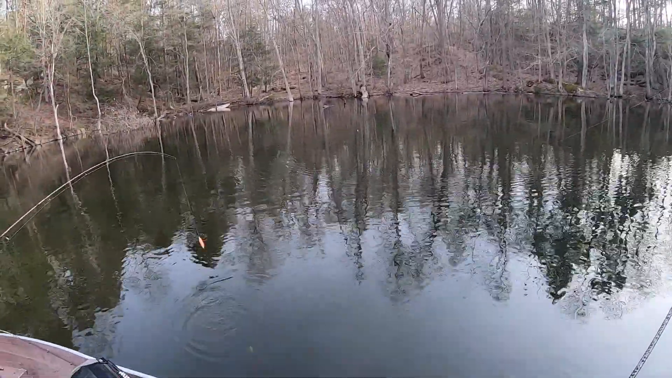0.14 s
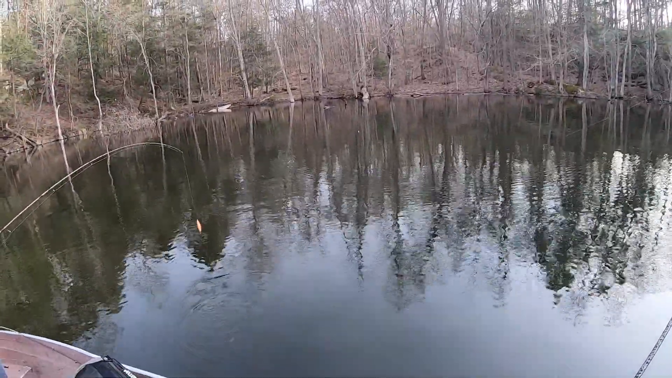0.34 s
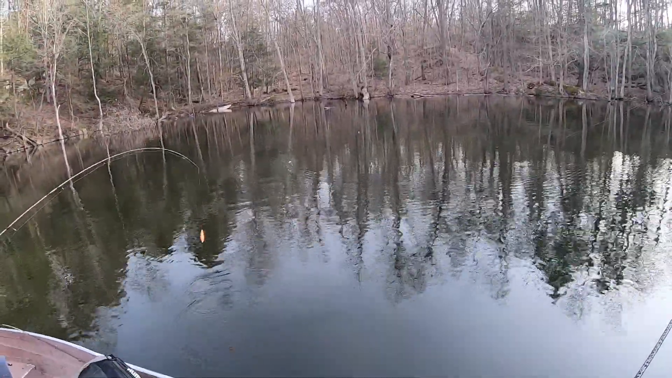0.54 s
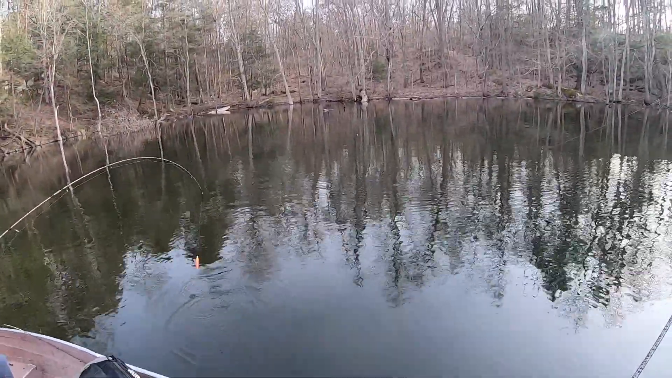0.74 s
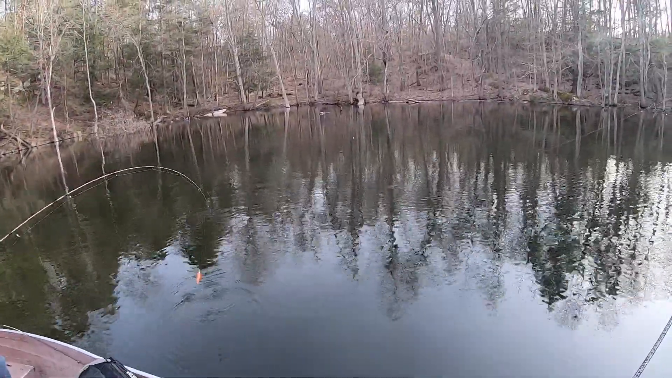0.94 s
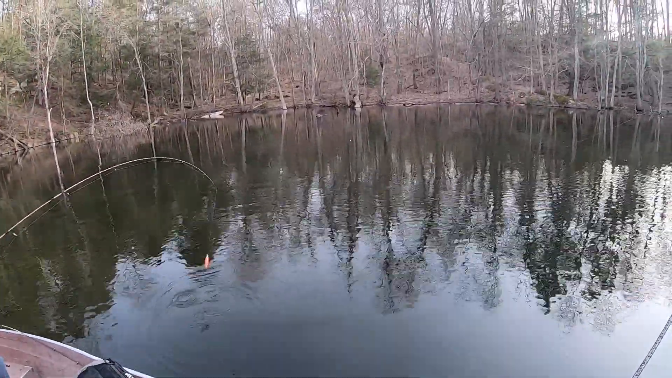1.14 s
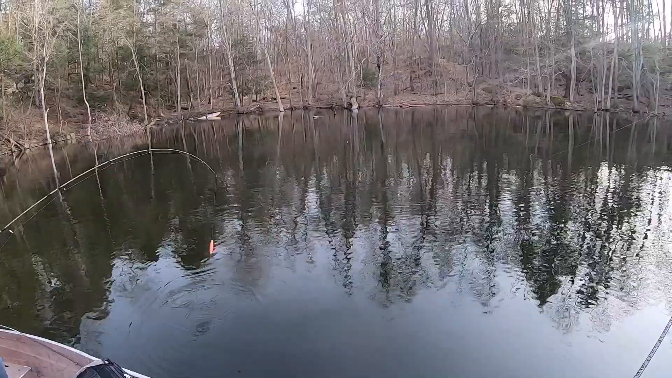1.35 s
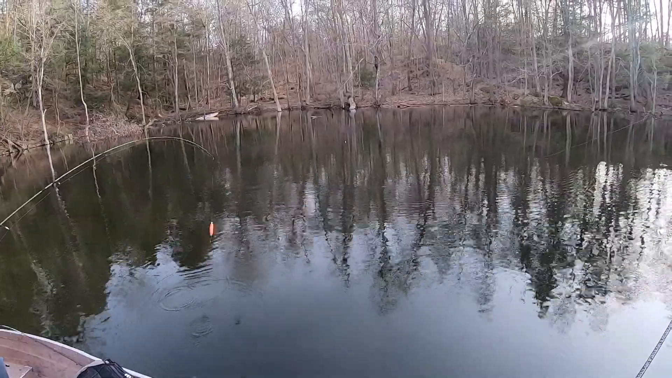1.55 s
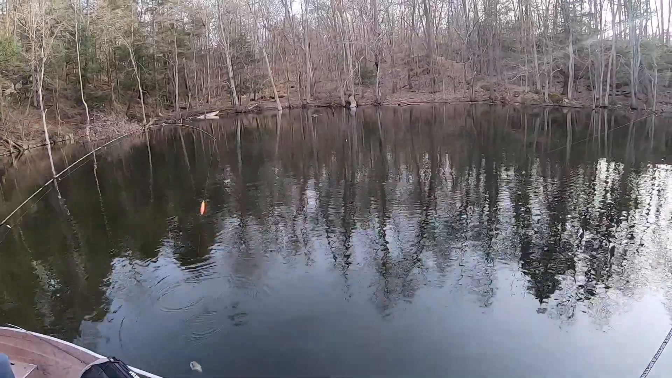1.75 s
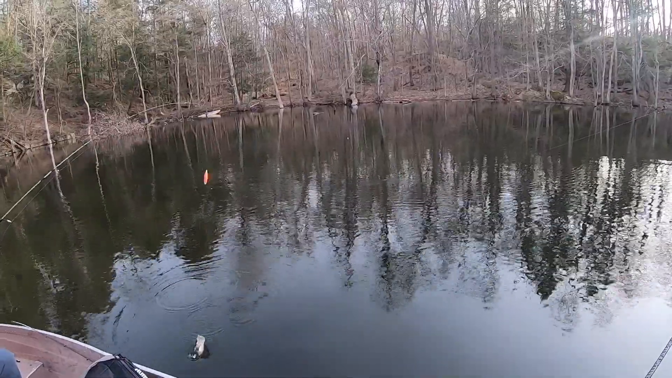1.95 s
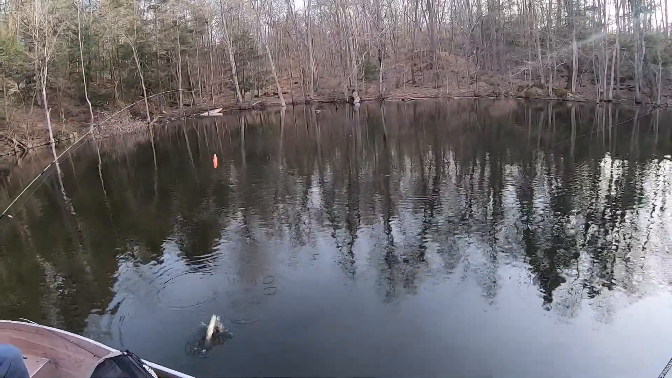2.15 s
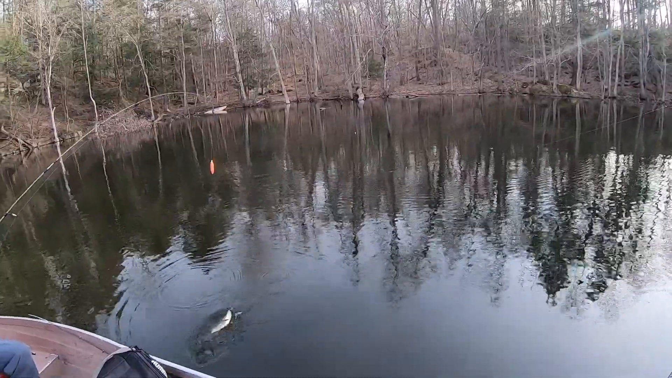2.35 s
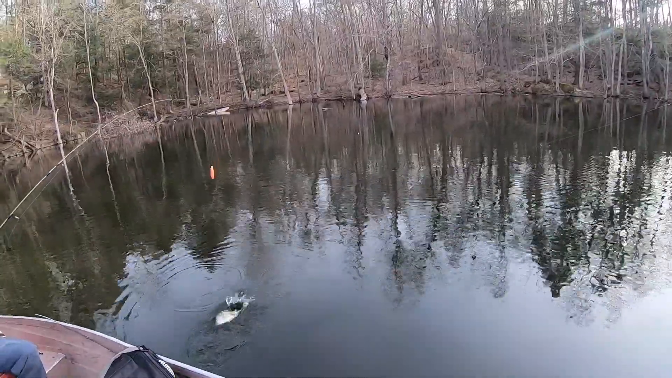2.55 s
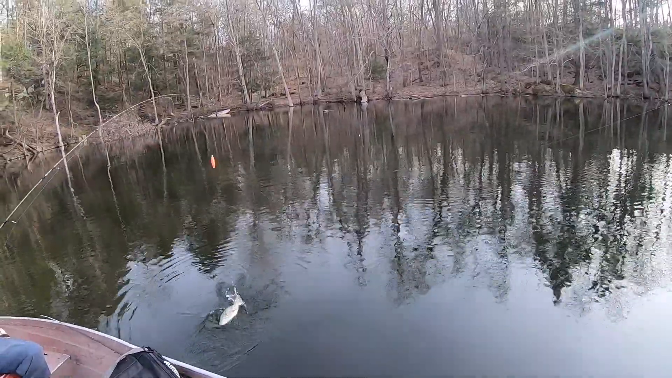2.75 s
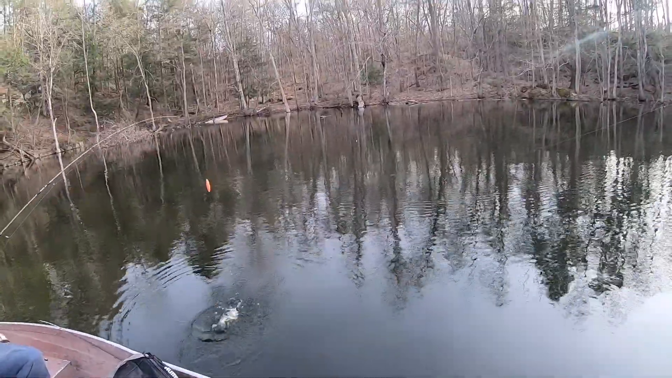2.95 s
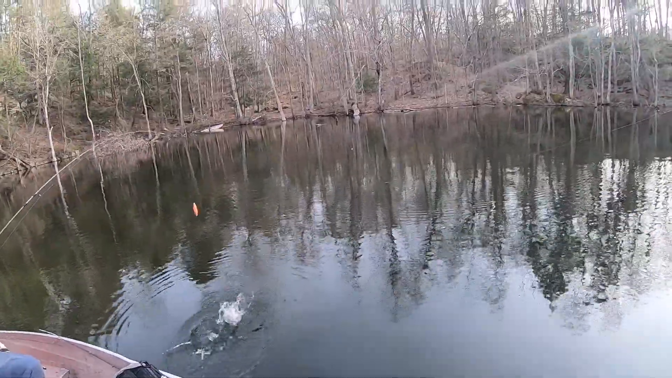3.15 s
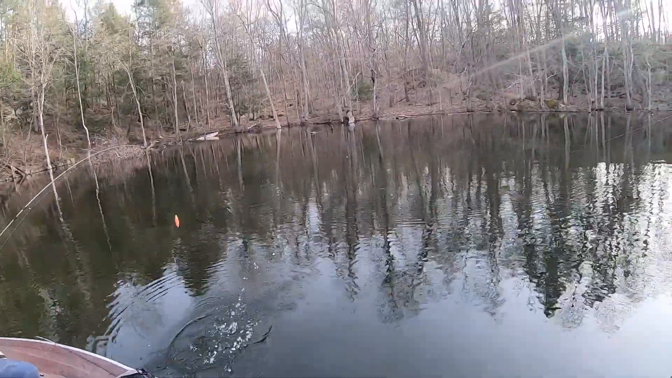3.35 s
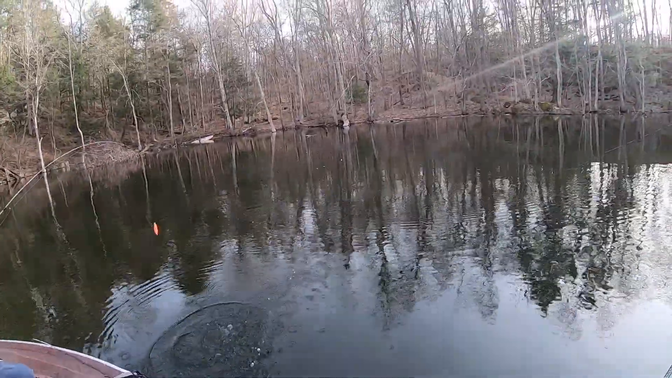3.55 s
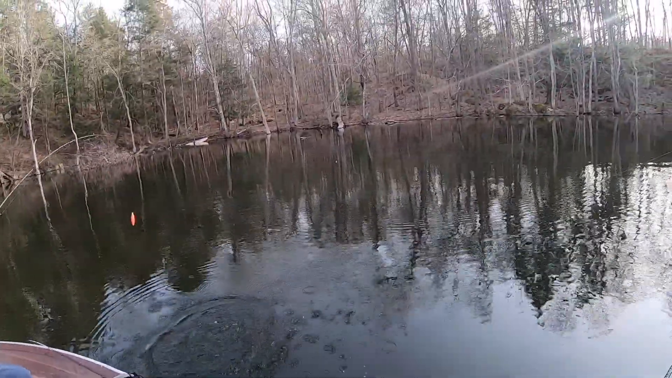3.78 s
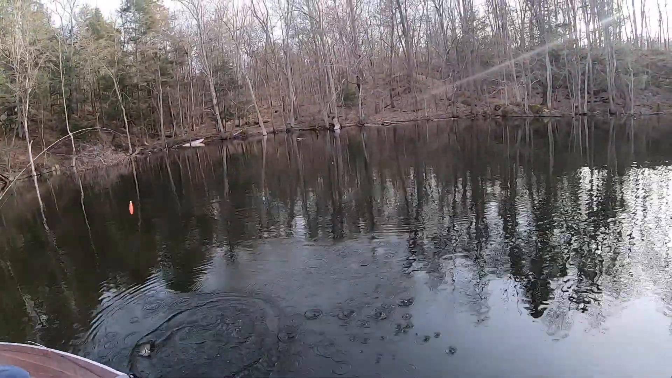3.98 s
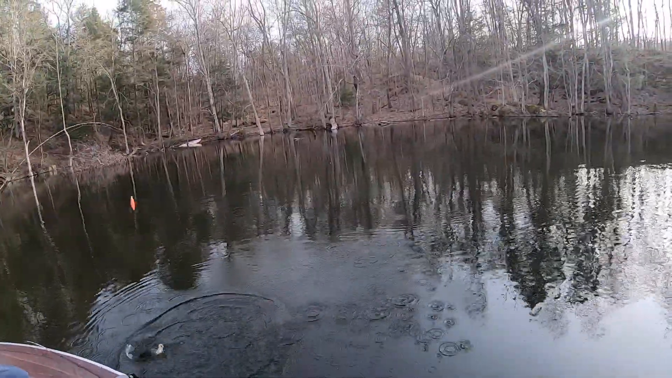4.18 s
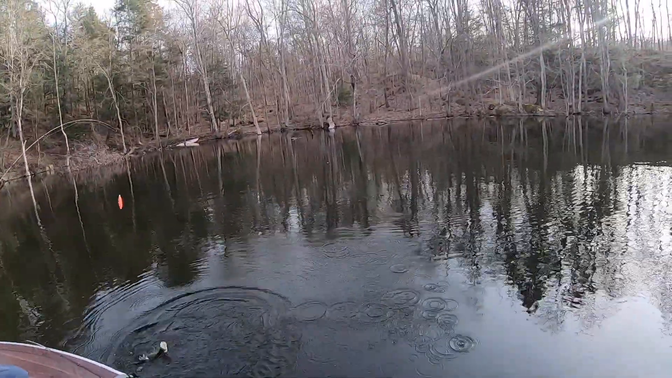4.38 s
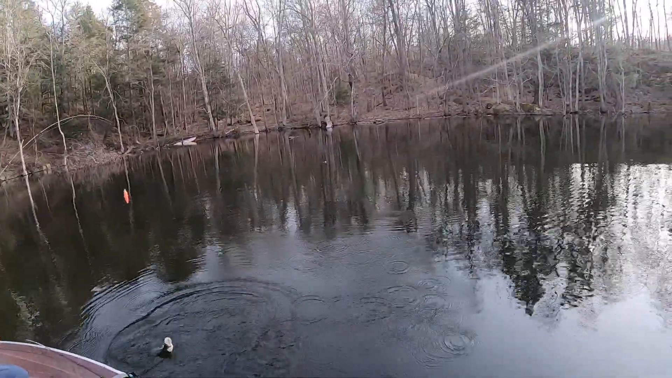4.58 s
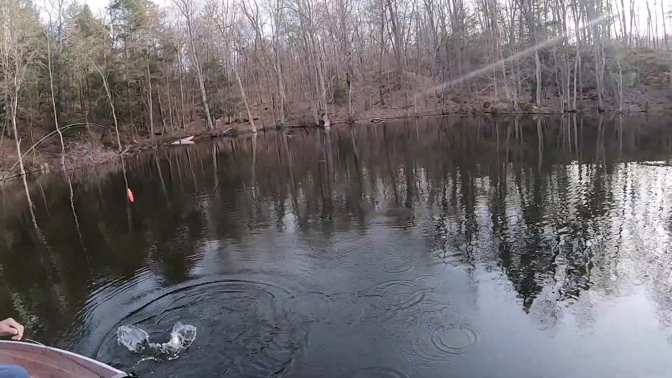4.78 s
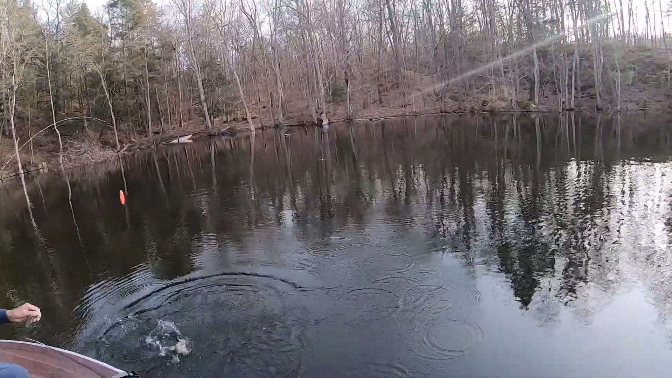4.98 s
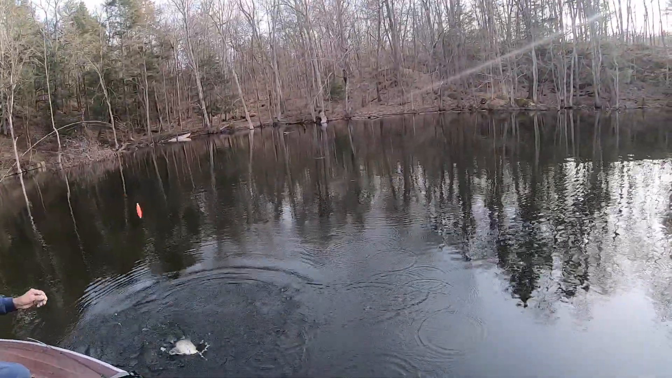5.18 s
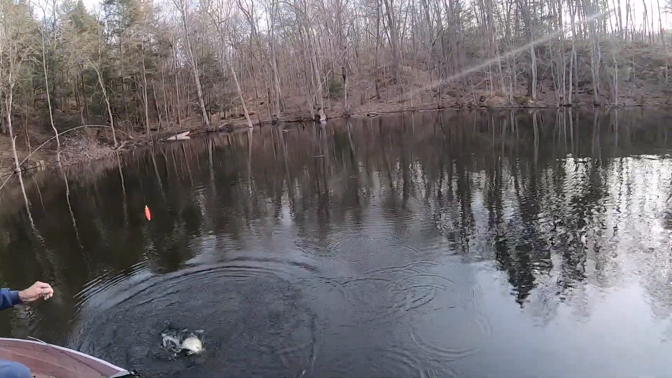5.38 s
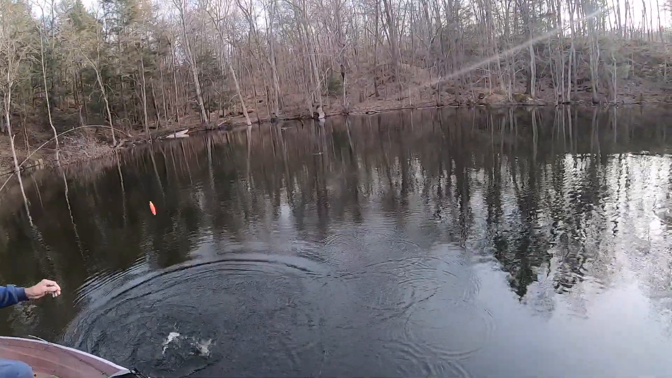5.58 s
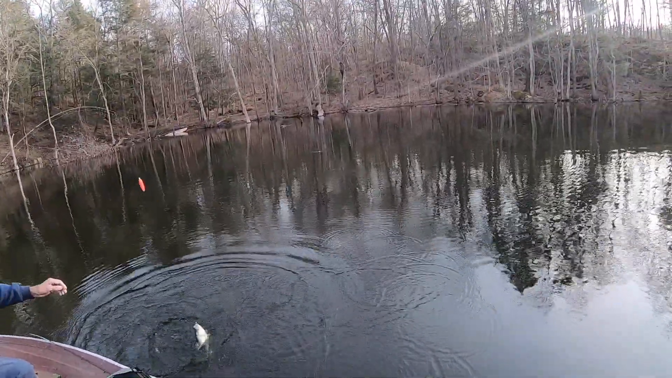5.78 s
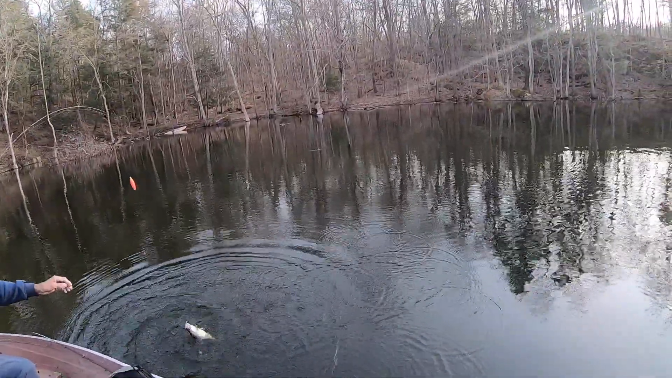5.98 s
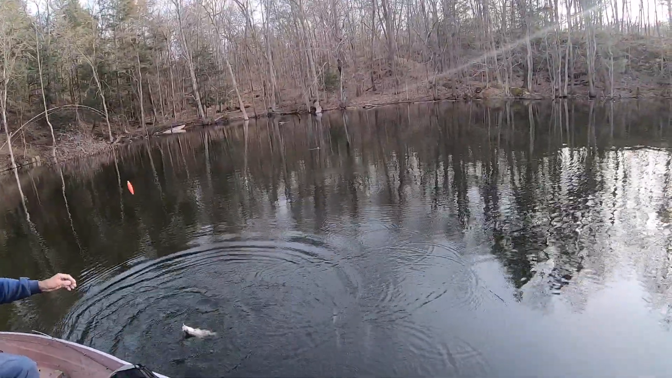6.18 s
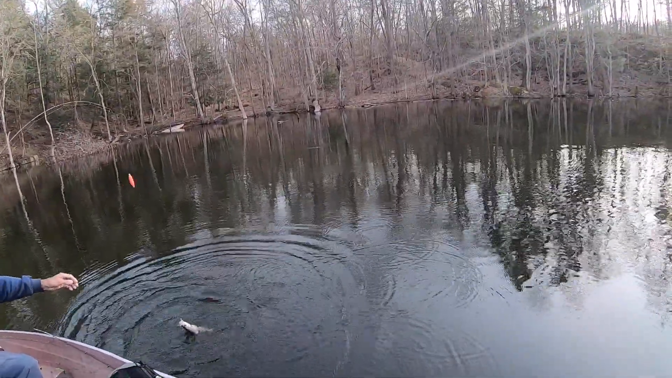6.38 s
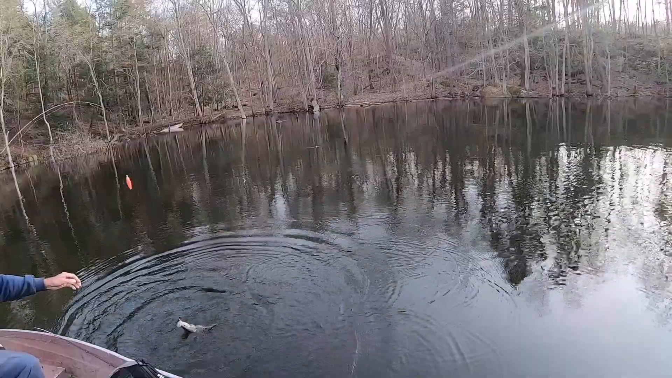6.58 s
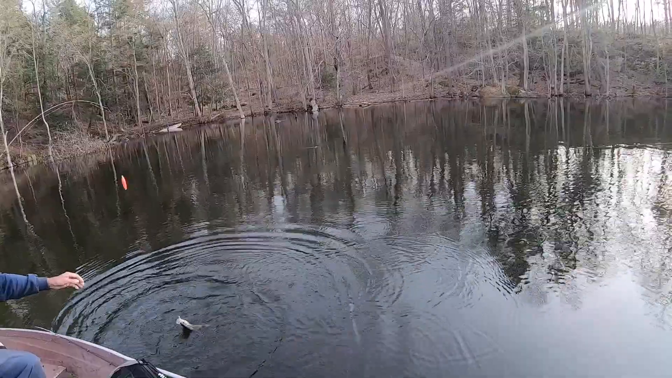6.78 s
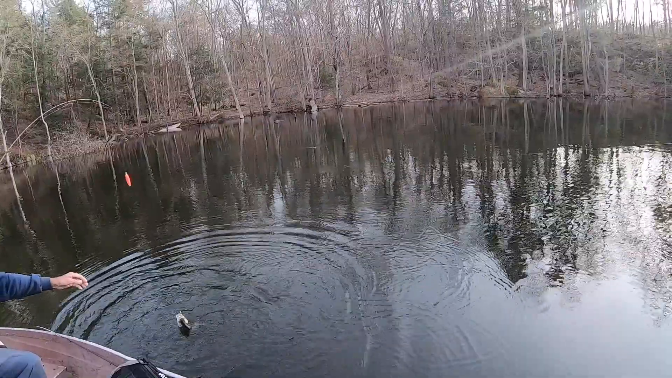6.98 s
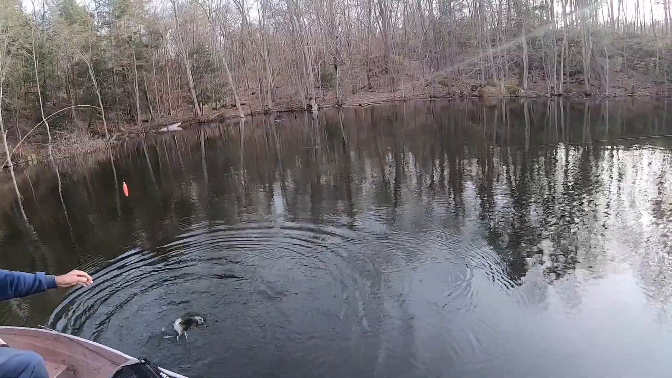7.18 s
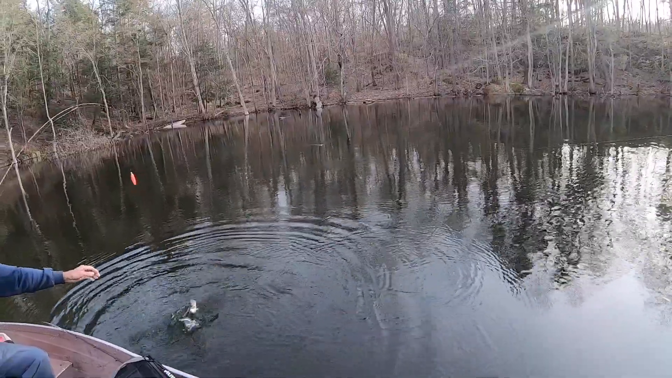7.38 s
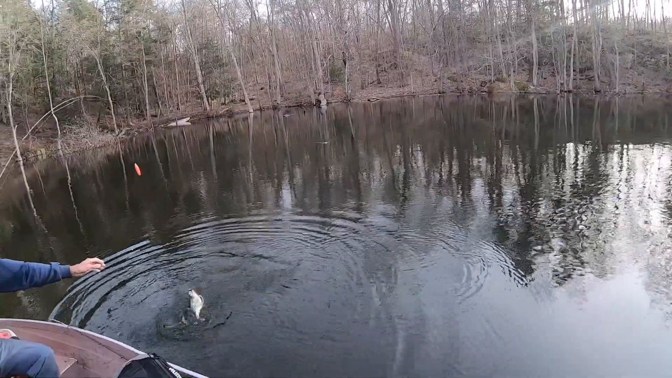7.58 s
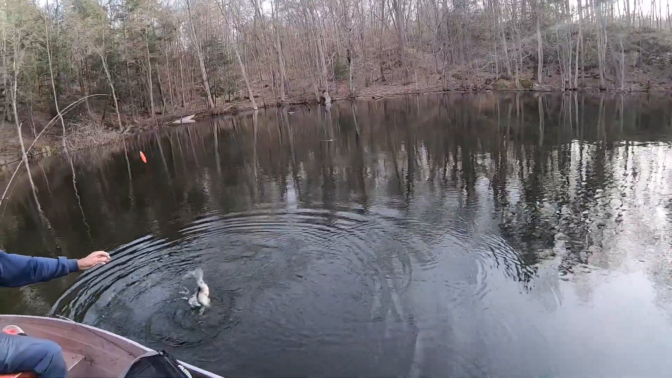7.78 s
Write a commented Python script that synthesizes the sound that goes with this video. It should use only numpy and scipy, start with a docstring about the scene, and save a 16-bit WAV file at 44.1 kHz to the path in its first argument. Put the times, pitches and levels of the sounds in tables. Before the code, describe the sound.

Outdoors on a quiet pond, far traffic hums softly. Low gusts thump the microphone, strongest on the left, with a brief wavering flutter. A fish breaks the surface nearby with ringing drops, sharp slaps, spray and gurgles. After a pause it thrashes again, then a few dull knocks sound on the boat hull before a last short flurry of splashes.

```python
"""A small boat on a still pond: far traffic hums throughout, light air and gusts thump from the start.
The gusts are band noise, strongest in the left microphone port, where a wavering tone soon flutters too.
Then a hooked fish thrashes: drops ring, air pockets pop and gulp, slaps churn up spray and gurgle, spray ticks.
These are rising sines, single or in dense random clouds, with filtered noise as fizz.
Late on, noise blows ring the modes of the hull as knocks."""
import sys
import numpy as np
from scipy import signal
from scipy.io import wavfile
from scipy.ndimage import uniform_filter1d

SR = 44100
rng = np.random.default_rng(int(sys.argv[2]) if len(sys.argv) > 2 else 0)


def unload_wav(signal):
    """Save mono or channel-first audio to the path in sys.argv[1] as 16-bit WAV at rate SR, clipped to [-1, 1]."""
    wavfile.write(
        sys.argv[1],
        SR,
        np.round(np.clip(np.atleast_2d(signal).T, -1, 1) * 32767).astype(np.int16),
    )


N = 345303

# slaps and rolls of the fish: (start [s], hold [s], spray level [dB], gurgle level [dB])
SLAPS = [(2.179, 0.048, -49.5, -62), (2.539, 0.0069, -43.5, -48), (2.62, 0.0045, -38, -36),
         (2.851, 0.2, -44.5, -41), (3.147, 0.018, -30, -39), (3.249, 0.19, -45, -49.5),
         (3.458, 0.17, -48.5, -54.5), (4.093, 0.22, -52, -54.5), (4.643, 0.0028, -42.5, -39.5),
         (4.701, 0.0078, -46.5, -38.5), (4.766, 0.14, -39.5, -39), (4.953, 0.2, -41, -47),
         (5.229, 0.15, -47.5, -53), (5.413, 0.064, -40, -36.5), (5.582, 0.15, -48, -51.5),
         (7.107, 0.0083, -41, -41.5), (7.214, 0.022, -49.5, -43), (7.331, 0.075, -50.5, -45),
         (7.452, 0.0042, -41.5, -36), (7.695, 0.0042, -41, -43), (7.795, .06, -41.5, -41.5)]


def gain_of(db):
    """Amplitude factor of a level in dB."""
    return 10 ** (np.asarray(db) / 20)


def evened(x):
    """Scales to rms 1."""
    return x / np.sqrt(np.mean(x ** 2) + 1e-20)


def read(points, hz):
    """Interpolates a (frequency, value) curve over log frequency."""
    f, value = np.transpose(points)
    return np.interp(np.log(hz + 1), np.log(f + 1), value)


def follow(rows):
    """Columns of a time curve at every sample; -120 outside its span."""
    s, *columns = np.transpose(rows)
    return [np.interp(np.arange(N) / SR, s, c, -120, -120) for c in columns]


def add(mix, s, sound):
    """Adds a sound into the mix from time s, cut at the end."""
    part = mix[round(s * SR):][:len(sound)]
    part += sound[:len(part)]


def wander(cutoff_hz):
    """Low-passed noise of rms 1, for slow random modulation."""
    sos = signal.butter(2, cutoff_hz, fs=SR, output="sos")
    return evened(signal.sosfilt(sos, rng.standard_normal(N)))


def resonate(x, hz, width_hz):
    """Resonance of gain 1 at a moving pitch: shifts hz down to zero, smooths, shifts back."""
    turn = np.exp(2j * np.pi * np.cumsum(hz * np.ones(len(x))) / SR)
    r = np.exp(-np.pi * width_hz / SR)
    return 2 * (turn * signal.lfilter([1 - r], [1, -r], x / turn)).real


def swells(starts_s, holds_s, levels_db, rise_db_s, fall_db_s):
    """Power of each swell at every 32nd sample: climbs, holds and dies away, straight in dB."""
    t = np.arange(0, N + 32, 32)[:, None] / SR - starts_s
    slope_db = rise_db_s * np.minimum(t, 0) - fall_db_s * np.maximum(t - holds_s, 0)
    return gain_of(levels_db + slope_db) ** 2


def full(slow):
    """Holds each slow value for 32 samples."""
    return np.repeat(slow, 32)[:N]


def scatter(x, t60_s):
    """Short diffuse noise tail, different per channel."""
    t = np.arange(3000) / SR
    tail = rng.standard_normal((2, 3000)) * gain_of(-60 * t / t60_s)
    return signal.oaconvolve(x, tail / np.linalg.norm(tail[0]), axes=1)[:, :N]


def traffic():
    """Far steady hum: spectrally shaped noise with soft drifting patches."""
    # hum spectrum: (frequency [Hz], relative level per Hz [dB])
    spectrum = [(100, -55.5), (146, 5), (205, 0.5), (281, -9), (508, -15.5), (712, -5.5), (1310, -8.5),
                (2220, -23.5), (9740, -36.5), (15500, -67)]
    # left-right likeness: (frequency [Hz], correlation [0-1])
    likeness = [(150, 0.9), (700, 0)]
    level_db, patch_db = -50.5, 1.93
    frames, hz = N // 256 + 5, np.fft.rfftfreq(1024, 1 / SR)
    a, b, c, d, patches = rng.standard_normal((frames, 513, 5)).T
    patches = evened(uniform_filter1d(uniform_filter1d(patches, 12, 0), 14, 1))
    same = np.clip(read(likeness, hz), -1, 1)[:, None]
    left = a + 1j * b
    right = same * left + np.sqrt(1 - same ** 2) * (c + 1j * d)
    z = np.array([left, right]) * gain_of(read(spectrum, hz)[:, None] + patch_db * patches)
    hum = signal.istft(z, nperseg=1024, noverlap=768)[1][:, :N]
    return gain_of(level_db) * evened(hum)


def thump(hz, width_hz):
    """Lumpy noise through three equal resonances, a steep band; rms 1."""
    push = rng.standard_normal(N) * gain_of(2 * wander(3.7))
    for _ in range(3):
        push = resonate(push, hz, width_hz)
    return evened(push)


def wind():
    """Lumpy gust pressure at each port, far stronger left, over light air."""
    # gusts at the left port: (start [s], hold [s], level [dB], thump centre [Hz])
    gusts = [(0, 0.15, -47, 39), (0.249, 0.013, -30, 36.9), (0.331, 0.15, -30, 43.1),
             (1.127, 0.14, -36, 77), (1.398, 0.096, -28.5, 73.8), (1.694, 0.21, -30, 96),
             (1.862, 0.11, -21.5, 75.3), (2.013, 0.27, -32, 104), (2.347, 0.14, -28.5, 98),
             (2.527, 0.26, -22.5, 101.4), (3.006, 0.13, -25.5, 91), (3.261, 0.16, -24.5, 68.5)]
    rise_db_s, fall_db_s, breeze_db = 650, 170, -57
    s, hold_s, levels_db, centres_hz = np.transpose(gusts)
    power = swells(s, hold_s, levels_db, rise_db_s, fall_db_s) + 1e-30
    total = power.sum(1)
    gust_db = full(10 * np.log10(total))
    hz = full(power @ centres_hz / total)
    ports = []
    for db in [gust_db, gust_db - 0.18 * hz]:  # the sheltered right port loses more of the higher thumps
        breeze = gain_of(breeze_db + 6.1 * wander(3.0))
        deep = thump(34.6, 50) * (gain_of(db - 15.0) + breeze)
        ports.append(thump(hz, 87.6) * gain_of(db) + deep)
    return np.array(ports)


def flutter():
    """Wind locks into a wavering tone with harmonics at the left port; weak and inverted right."""
    # flutter curve: (time [s], pitch [Hz], relative level [dB], relative octave level [dB])
    curve = [(1.58, 91.3, -67, -32), (1.7, 108.1, -28.5, -37.5), (1.86, 90.2, -34, -34.5),
             (1.93, 115, -25, -37.5), (2.05, 131.7, -24.5, -50.5), (2.19, 100.6, -28.5, -38),
             (2.27, 96.6, -35, -29), (2.45, 92, -78, -37.5)]
    pitch_hz, low_db, octave_db = follow(curve)
    low, octave = uniform_filter1d(gain_of([low_db, octave_db]), size=600)
    turns = 2 * np.pi * np.cumsum(abs(pitch_hz) * (1 + 0.034 * wander(30.7))) / SR
    upper = np.cos(2 * turns) + 0.17 * np.cos(3 * turns)
    tone = gain_of(2.5 + 2.0 * wander(32.0)) * (low * np.cos(turns) + octave * upper)
    return tone * [[1], [-.12]]


def bubble(hz, ring_s, rise_oct, start_s, fade_db=50):
    """A sine whose pitch climbs ever faster as the bubble nears the surface, where it bursts; peak 1."""
    t = np.arange(int(ring_s * SR) + 8) / SR
    pitch_hz = np.minimum(hz * 2 ** (rise_oct * (t / ring_s) ** 1.6), SR / 2.5)
    turns = np.cumsum(pitch_hz) / SR
    edges = (1 - np.exp(-t / start_s)) ** 2 * (1 - np.exp((t - t[-1]) * hz))
    wave = np.sin(2 * np.pi * turns) * gain_of(-fade_db * t / ring_s) * edges
    return wave / abs(wave).max()


def drops_and_pops():
    """Ringing drops and popping air pockets: each a short steep chirp, then a brief rising ring."""
    # ringing drops and popping air pockets: (time [s], ring level [dB], start pitch [Hz])
    rows = [(1.9772, -37.5, 3120), (2.0006, -33.5, 3570), (4.0654, -36.5, 2900), (2.1785, -31, 3580),
            (2.2043, -27.5, 2990), (2.2303, -25.5, 2320), (2.3447, -31, 2660), (2.904, -21, 307),
            (2.9482, -12, 2960), (3.031, -25, 2830), (3.1513, -9.5, 3140), (4.158, -29.5, 3150),
            (4.1773, -22.5, 3140), (4.325, -29, 1555), (4.498, -22, 1644), (4.6418, -18, 3360),
            (5.1035, -18, 2730), (5.313, -24, 2720), (5.318, -23, 910), (5.666, -30.5, 1134),
            (5.689, -28, 1174), (7.099, -12.5, 3634), (7.2327, -21.5, 3570), (7.248, -28, 3230),
            (7.3123, -26, 2980), (7.344, -35, 1990), (7.457, -19, 1234), (7.5675, -19, 3370),
            (7.581, -31.5, 1040), (7.7842, -19.5, 2890), (7.823, -17.5, 1255)]
    out = np.zeros(N)
    for s, db, hz in rows:
        add(out, s, gain_of(db - 9) * bubble(1.1 * hz, .003, 2.5, .0004))
        add(out, s, gain_of(db) * bubble(hz, 22 / hz, 0.86, 0.00049))
    return out


def colour():
    """Causal (minimum-phase) impulse response with the water's spectrum, peak 1."""
    # water as the microphone colours it: (frequency [Hz], level per Hz [dB])
    spectrum = [(150, -35), (250, -12), (614, 0), (1150, 4.5), (2360, 5.5), (3830, 9), (6540, 3),
                (8620, -10), (10100, -5), (13700, -27)]
    log_gain = np.log(gain_of(read(spectrum, abs(np.fft.fftfreq(4096, 1 / SR)))))
    taps = np.fft.ifft(np.exp(np.conj(signal.hilbert(log_gain)))).real[:1024]
    return taps / abs(taps).max()


def grains(low_hz, high_hz, per_s, spread_db, cycles, rise_oct, fade_db, count):
    """Random small bubbles of log-spread pitch and like energy per Hz, heard a little left or right."""
    out = np.zeros((2, N))
    size = gain_of(spread_db * np.minimum(rng.exponential(1, N), 3)) * (rng.random(N) < per_s / SR)
    kind = rng.integers(0, count, N)
    for k, hz in enumerate(np.geomspace(low_hz, high_hz, count)):
        ring_s = cycles * (.5 + rng.random()) / hz
        tap = bubble(hz, ring_s, rise_oct * rng.random(), 1 / hz, fade_db)
        tap = tap * np.sqrt(hz) / np.linalg.norm(tap)
        out[k % 2] += signal.oaconvolve(size * (kind == k), tap)[:N]
    return out + 1.8 * out[::-1]


def slap_gain(levels_db):
    """Each slap, then a slower trickle as thrown water drips back."""
    rise_db_s, fall_db_s = 550, 320
    trickle_db, trickle_fall_db_s = -12, 38
    s, hold_s = np.transpose(SLAPS)[:2]
    power = swells(s, hold_s, levels_db, rise_db_s, fall_db_s)
    power = power + swells(s, hold_s, levels_db + trickle_db, rise_db_s, trickle_fall_db_s)
    return full(np.sqrt(power.sum(1)))


def churn():
    """Clumped spray and gurgle, each over a thin fizz of bubbles too small to tell apart."""
    foam_db = -43  # churn level at which the fizz has its full share
    edge_hz = 2000
    # (bubbles, fizz filter, fizz share, clumping [dB])
    layers = [(grains(2300, 15000, 1300, 3.7, 24, .6, 36, count=24), "high", .7, 3.5),
              (grains(350, 1700, 350, 3.2, 20, .7, 24, count=18), "low", .45, 2.5)]
    taps = colour()
    out = 0
    for levels_db, (pops, side, fizz, clump_db) in zip(np.transpose(SLAPS)[2:], layers):
        a, b = rng.standard_normal((2, N))
        sos = signal.butter(3, edge_hz, side, fs=SR, output="sos")
        hiss = signal.sosfilt(sos, [a + 0.75 * b, a - 0.24 * b])
        gain = slap_gain(levels_db)
        share = fizz * np.sqrt(gain / gain_of(foam_db))  # weak water falls in single drops, strong foams
        water = signal.oaconvolve(evened(pops) + share * evened(hiss), taps[None])[:, :N]
        water = water / np.sqrt(1 + share ** 2) / np.linalg.norm(taps)
        out = out + gain * gain_of(clump_db * wander(28)) * water
    return out


def ticks():
    """Falling spray ticks on the surface: short upward chirps through the water's colour."""
    # ticks: (time [s], level [dB], centre [Hz])
    rows = [(2.338, -37.5, 4530), (2.776, -29, 3380), (2.9052, -19.5, 3680), (3.2833, -31, 5600),
            (3.297, -27.5, 4700), (3.366, -20.5, 3210), (3.4182, -23.5, 6150), (3.5087, -28, 3800),
            (3.555, -25, 2920), (3.6075, -26.5, 3470), (3.7233, -31, 3800), (3.877, -28, 4230),
            (3.903, -32.5, 5930), (4.122, -38, 3600), (4.221, -33, 4600), (4.228, -34, 3120),
            (4.6322, -24.5, 4170), (4.7461, -20, 4840), (4.8206, -22.5, 4400), (5.151, -27.5, 3630),
            (5.4194, -20.5, 4000), (5.455, -18.5, 4100), (7.166, -33, 3500), (7.294, -36, 7600),
            (7.5792, -27, 5070), (7.8, -28, 4550)]
    start_share, ring_s, rise_oct = 0.77, 0.0042, 1.565  # start pitch as a share of the centre
    out, taps = np.zeros(N), colour()
    for s, db, hz in rows:
        tick = np.convolve(bubble(start_share * hz, ring_s, rise_oct, 0.00095, 19.6), taps)
        add(out, s, gain_of(db) * tick / abs(tick).max())
    return out


def gulps():
    """Air pockets closing at the surface: a crack as each is trapped, then a shaky climb in pitch."""
    # pockets: (time [s], level before wobble [dB], start pitch [Hz], rise [octaves])
    rows = [(2.612, -25, 884, 1.14), (3.125, -31.5, 910, 0.059), (3.258, -36.5, 917, 0.045),
            (3.288, -31.5, 983, 0.58), (3.348, -38, 628, 0.11), (4.503, -48, 529, 1.08),
            (4.782, -28, 758, 0.565), (4.807, -34, 493, 0.22), (4.893, -31, 570, 0.56),
            (5.038, -38, 892, 0.47), (5.141, -30.5, 1360, 0.28), (5.352, -27, 719, 0.61),
            (5.425, -29.5, 341, 3.4), (7.104, -29, 1254, 0.69), (7.131, -31, 742, 1.77),
            (7.216, -34.5, 695, 0.9), (7.46, -33.5, 640, 1)]
    cycles, fade_db = 19.0, 4.5  # ring length in periods of the start pitch, fade over it
    out = np.zeros(N)
    wobble = gain_of(4.5 * wander(300))  # the pocket's walls shake as it closes
    for s, db, hz, rise_oct in rows:
        gulp = bubble(hz, cycles / hz, rise_oct, 0.0012, fade_db)
        shake = wobble[:round(s * SR)][-len(gulp):]
        add(out, s, gain_of(db) * gulp * shake)
        add(out, s, gain_of(db - 8.0) * bubble(hz, 0.00067, 5.1, .0001))  # crack
    return out


def hull():
    """Short scraping noise blows ring the modes of the hull."""
    # knocks: (time [s], level before high-pass [dB])
    knocks = [(5.767, -35), (5.787, -35), (5.802, -29.5), (5.844, -36), (5.907, -35), (5.959, -41.5),
              (6.47, -32), (6.716, -36.5), (6.772, -29.5), (6.865, -31), (7.018, -27.5), (7.05, -28.5)]
    # hull modes: (frequency [Hz], relative level [dB], t60 [s])
    modes = [(224, -9.5, 0.12), (332, 7, 0.017), (726, 11, 0.0039), (1340, 3.5, 0.0048)]
    t, out = np.arange(4000) / SR, np.zeros(N)
    ring = sum(gain_of(db - 60 * t / t60) * np.sin(2 * np.pi * hz * t) for hz, db, t60 in modes)
    scrape = gain_of(-60 * t[:2000] / 0.12) * np.minimum(t[:2000] / 0.0039, 1)
    for (s, db), blow in zip(knocks, rng.standard_normal((len(knocks), 2000))):
        knock = np.convolve(blow * scrape, ring)
        add(out, s, gain_of(db) * knock / abs(knock).max())
    # high-pass: the microphone passes little deep bass of the knocks
    return signal.sosfilt(signal.butter(3, 150, "high", fs=SR, output="sos"), out)


def scene():
    """Sums the far hum, the wind and the near sounds with their short echo."""
    near = drops_and_pops() + churn() + ticks() + gulps() + hull()
    echo = gain_of(-13.5) * scatter(near, 0.15)  # boat side and ripples
    return traffic() + wind() + flutter() + near * gain_of([[.4], [-.4]]) + echo


def record(dry):
    """The housing scatters the top octave in opposite sense into the two ports; then the band limit."""
    edge_hz = 15600
    top = signal.sosfilt(signal.butter(6, 7800, "high", fs=SR, output="sos"), dry.mean(0))
    ports = dry + gain_of(-10) * scatter(top[None], .004)[0] * [[1], [-1]]
    taps = signal.firwin(511, edge_hz, window=("kaiser", 9), fs=SR)
    return signal.oaconvolve(ports, taps[None], "same")


dry = scene()
out = record(dry)
unload_wav(out)
```